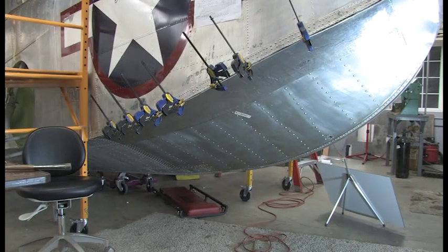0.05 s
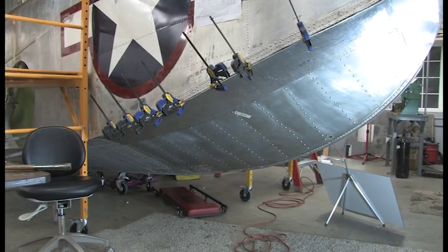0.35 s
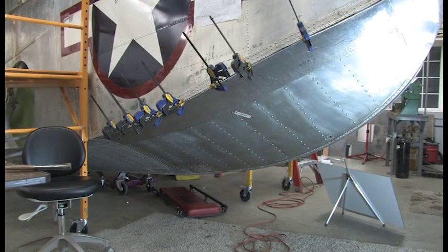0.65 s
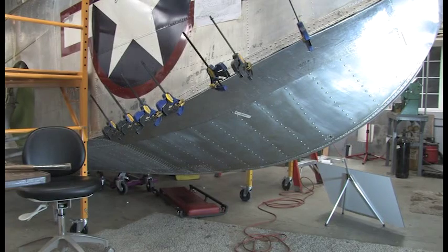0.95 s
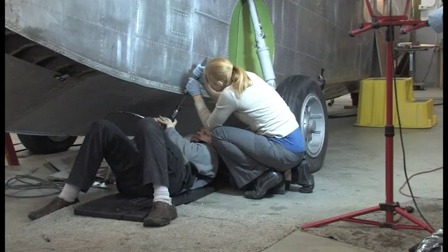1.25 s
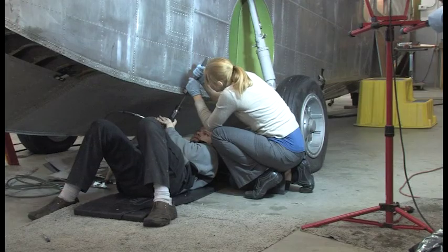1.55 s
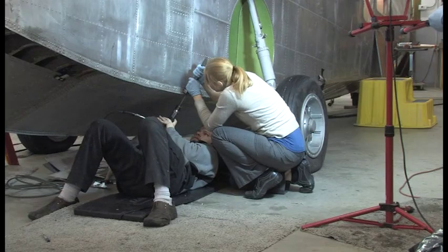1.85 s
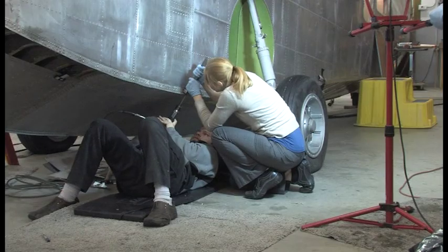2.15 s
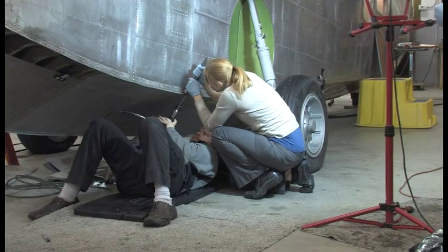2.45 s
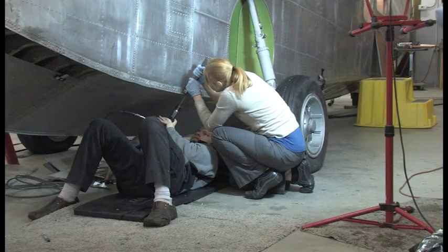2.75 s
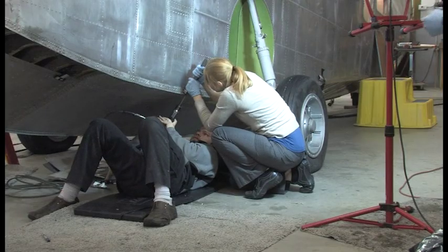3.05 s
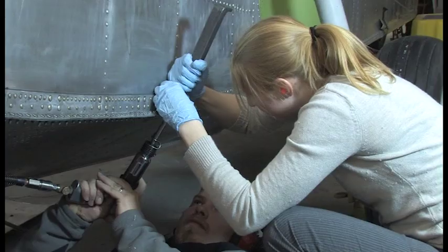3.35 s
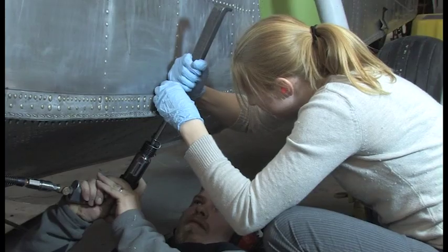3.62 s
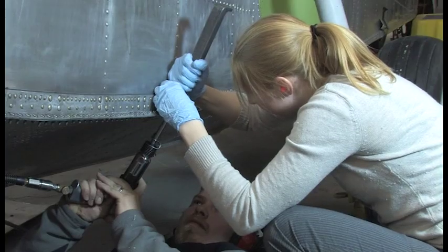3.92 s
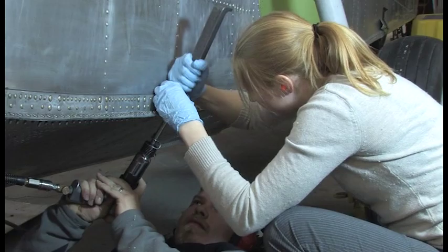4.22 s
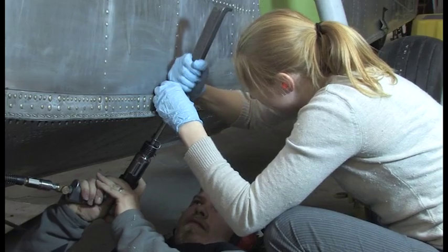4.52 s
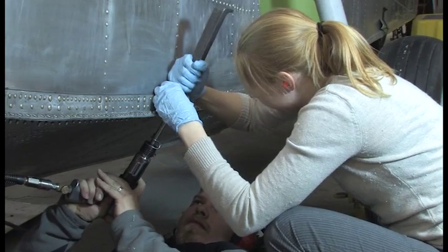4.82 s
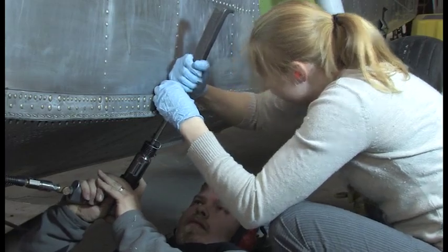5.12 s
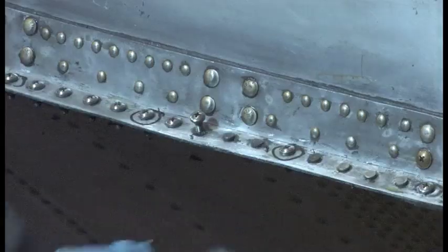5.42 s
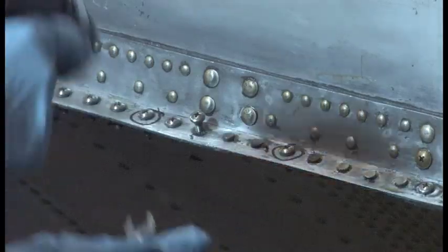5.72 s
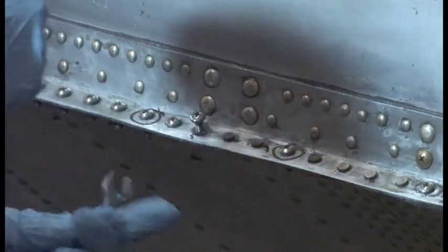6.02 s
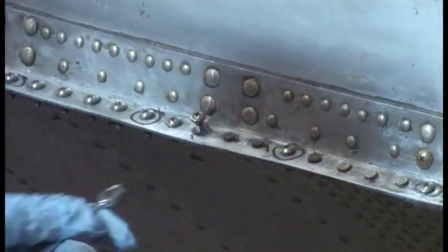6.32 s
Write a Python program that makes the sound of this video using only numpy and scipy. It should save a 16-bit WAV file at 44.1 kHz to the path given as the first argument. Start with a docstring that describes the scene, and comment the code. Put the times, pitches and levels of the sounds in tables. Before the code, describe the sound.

For the first second, small loose steel parts knock, clink and scrape in a few light, high shakes over faint hangar room tone. At about 1 second a pneumatic rivet gun starts abruptly a few metres away, stuttering against an aircraft's aluminium skin. Each blow is a sharp crack with a metallic ring and a short echo. From about 2 seconds it runs faster and louder, and the panel drums beneath it. Just after 3 seconds the sound dips briefly and returns close by, drier, with a dense sheet-metal rattle and a shrill steel ring. The hammering speeds up and is loudest around 4.5 seconds, then slows to a few weak blows and stops at about 4.8 seconds, ringing away quickly. From about 5.2 seconds to the end at 6.6, an air compressor throbs faintly, with quick chugs and a soft hiss.

```python
"""A pneumatic rivet gun drives rivets into an aircraft's aluminium skin in a hangar.
Each piston blow cracks on the rivet, rings the steel set and shakes the skin.
Four parts, joined by brief fades: loose steel parts jingle; the gun stutters and speeds up a few
metres off; it hammers close by with a shrill ring and stops; an air compressor throbs faintly."""
import sys
import numpy as np
from scipy import signal
from scipy.fft import rfft, irfft
from scipy.io import wavfile
from scipy.ndimage import uniform_filter1d, minimum_filter1d

SR = 44100
rng = np.random.default_rng(int(sys.argv[2]) if len(sys.argv) > 2 else 0)


def pcm_store(signal):
    """Save signal as 16-bit PCM."""
    levels = np.round(np.clip(np.atleast_2d(signal), -1, 1) * 32767)
    wavfile.write(sys.argv[1], SR, levels.astype(np.int16).T)


N = 289602
TIME_S = np.arange(N) / SR
FREQ_HZ = np.fft.rfftfreq(N, 1 / SR)

# scene parts: start_s, end_s, fade_in_s
PARTS = [(-.01, .985, .005), (1.003, 3.154, .006), (3.165, 5.223, .02), (5.232, 6.6, .04)]
# hangar reverb: freq_hz, t60_s
HANGAR_DECAY = [(100, 0.8), (500, 0.82), (2000, 0.91), (5000, 0.6), (9000, 0.28), (14000, 0.18)]
# stereo width: freq_hz, side_db
WIDTH = [(60, -28), (200, -45), (600, -45), (1200, -37), (2200, -28), (9000, -28), (13000, -24)]
# room tone: freq_hz, density_db
AIR_SPECTRUM = [(15, -58), (25, -23), (119, -16.5), (326, -8), (485, -7.5), (666, -3), (1260, -8),
                (2640, -5.5), (3180, -6.5), (4850, -4.5), (6670, -15.5), (8470, -13), (11000, -30),
                (12600, -45), (14000, -55)]
# its resonances: freq_hz, width_hz, lift_db
AIR_PEAKS = [(256, 64, 8.5), (490, 60, 2.5), (1040, 28, -3), (2690, 240, 6), (4530, 150, 7), (4970, 42, 14)]

# first knock of the steel parts: freq_hz, level_db, t60_s
FIRST_KNOCK_MODES = [(3710, -37.5, .09), (3900, -39, .09), (5430, -38, 0.055), (6420, -41, 0.071),
                     (6700, -45, .06)]
# shakes of the parts: start_s, length_s, clink_db, scrape_db, pitch_hz
SHAKES = [(0.052, .1, -25, -41, 4975), (0.202, 0.022, -43, -48, 4950), (0.341, 0.014, -40, -39, 4940),
          (0.411, 0.092, -36, -39, 4980), (0.413, .14, -37, -42, 4550), (0.598, .06, -39, -47, 4580),
          (0.669, 0.04, -36, -44, 4990), (.68, .03, -47, -47, 4500), (0.929, 0.042, -45, -50, 4985)]
# one clink: pitch_ratio, level_db, t60_s
CLINK_MODES = [(1, -6.5, 0.14), (.92, -34, 0.052), (.76, -24, 0.051), (1.7, -31, 0.045), (1.79, -19, 0.081),
               (2.53, -24, 0.057), (.213, -24, 0.15)]
# low tones: peak_s, pitch_hz, level_db, rise_s, fall_s
HUMS = [(.09, 355, -55, 0.035, 0.046), (.29, 355, -51, 0.12, .08), (.47, 465, -51, 0.044, 0.07),
        (0.539, 342, -55, 0.033, 0.038), (.655, 465, -53, 0.036, .05), (.86, 252, -61, .06, .1),
        (6.53, 671, -55, 0.055, 0.068)]

# piston speed: time_s, rate_hz
FAR_RATE = [(1.0068, 20.5), (1.1704, 22.66), (1.5218, 20.59), (1.7959, 23.31), (2.0459, 28.81),
            (2.3138, 27.97), (2.9395, 32.28), (3.14, 31.31)]
NEAR_RATE = [(3.08, 22.11), (3.2, 22.32), (3.35, 20.18), (3.45, 26.48), (3.7, 29.47), (3.95, 33.49),
             (4.15, 36.14), (4.35, 36.45), (4.58, 35.89), (4.66, 22.83), (4.82, 22.9)]
# blow strength: time_s, force_db, crack_db, set_ring_db, boom_db (far only)
FAR_DRIVE = [(1.0, -18, -22, -67, -53), (1.12, -13.5, -24, -69, -33), (1.27, -14.5, -19.5, -35, -42),
             (1.45, -15.5, -25, -47, -37), (1.66, -15.5, -24, -78, -38.5), (1.71, -15, -27, -65, -39.5),
             (1.89, -11, -32, -37, -41), (2.02, -4, -23.5, -37.5, -27), (2.28, -6, -36.5, -27.5, -27),
             (2.32, -1.5, -27.5, -31.5, -25), (2.49, -4.5, -23, -29.5, -30.5),
             (2.62, -0.5, -20, -40, -34.5), (2.92, 0.5, -19.5, -24.5, -27), (3.13, -0.5, -20, -32, -28.5)]
NEAR_DRIVE = [(3.17, -9.5, -33.5, -27.5), (3.4, -5.5, -31.5, -23), (3.55, -7, -27, -20),
              (3.9, -5, -27.5, -18.5), (4.25, 0.5, -22.5, -20), (4.5, 3, -25.5, -17.5),
              (4.67, -1, -28, -37.5), (4.74, -13, -71, -76), (4.81, -17, -53, -66)]
# square or glancing blows: time_s, accent_db
ACCENTS = [(1.006, -14), (1.0544, 0.5), (1.1011, 0), (1.146, -0.5), (1.1909, 1), (1.2355, 0),
           (1.2813, -0.5), (1.327, -7.5), (1.3724, 0), (1.4198, 1.5), (1.467, 1.5), (1.5147, 0.5),
           (1.5628, -1), (1.611, 0.5), (1.6579, 1), (1.701, -5), (1.7467, 8), (1.8318, 10.5), (1.9865, 8),
           (2.057, 8), (2.092, 4.5), (2.127, -11), (2.162, 8.5), (2.198, -9), (2.2315, 12.5), (2.269, -8),
           (2.303, 14), (2.339, -1), (2.374, 1), (2.41, -3), (2.445, -1), (2.48, 3), (2.513, 4.5),
           (2.581, 5.5)]
# skin and crack noise: freq_hz, density_db
FAR_SKIN_SPECTRUM = [(30, -18), (100, -20.5), (170, -12.5), (300, -11), (600, -1.5), (1300, 2.5), (2000, 3),
                     (3000, 4), (4800, 3), (6500, -6), (8600, -5.5), (10000, -17), (12500, -17.5),
                     (15000, -58)]
NEAR_SKIN_SPECTRUM = [(30, -22.5), (100, -16), (220, -3.5), (400, 0.5), (750, 3), (1400, -0.5), (2700, 1.5),
                      (5000, 1.5), (6800, -3.5), (8600, -9), (9400, -7.5), (10200, -12), (11000, -36.5),
                      (12200, -8), (13500, -42.5), (15000, -69.5)]
CRACK_SPECTRUM = [(100, -44.5), (1500, -13), (2500, -8), (4000, -1.5), (5500, -2), (7000, 0), (8000, -7),
                  (10500, -18.5), (12500, -17), (14000, -49.5), (15000, -70)]
# their resonances: freq_hz, width_hz, lift_db
FAR_SKIN_PEAKS = [(248, 31, 5), (340, 66, 5), (560, 48, 3), (820, 180, 3.5), (968, 107, 7), (1630, 60, 1),
                  (2710, 250, 6), (2807, 90, 6.5), (3240, 130, 7), (3570, 110, 5.5), (4090, 170, 2.5),
                  (4480, 60, 0), (5030, 213, -2), (5390, 150, 11)]
NEAR_SKIN_PEAKS = [(242, 45, 1.5), (488, 40, 3.5), (975, 300, 8), (2880, 200, 3.5), (4325, 60, 4),
                   (4810, 70, 3), (5927, 50, 5), (6720, 350, -2.5), (7030, 90, 6), (7800, 400, 4)]
FAR_CRACK_PEAKS = [(3560, 670, 5.5), (4840, 330, 7.5), (5670, 180, 6)]
NEAR_CRACK_PEAKS = [(2260, 390, 15), (4470, 110, 5.3), (5790, 160, 5.4), (6180, 280, 7.1), (10710, 720, 16),
                    (12010, 480, 20.3)]
# bucking bar and rivet set: freq_hz, level_db, t60_s
BAR_MODES = [(1655, -5, 0.16), (2260, 0.5, 0.057), (3990, 7.5, 0.052), (4310, -6, 0.043), (4420, 4, 0.064)]
SET_MODES = [(8228, 0, .085), (10900, -27, .08), (12136, -18, .08)]
# piston and shank: freq_hz, far_db, near_db, delay_s, rise_s, db_per_force_db
SHANK_PINGS = [(2542, -3, -6, -.002, 0.0012, 0), (4427, -5.5, -4, .003, 0.0021, 0),
               (4870, 2, -4.5, -.0003, 0.0016, .2), (5300, -8.5, -14, .0003, .0012, -.2),
               (6260, -15, 4.5, .0005, 0.0011, -0.2), (7180, -15.5, -6, .0005, .0009, -0.5)]
# panel under changing bar pressure: time_s, pitch_hz, drum_db, bulge_db
PANEL_TRACK = [(1.0, 258, -52, -72), (1.08, 275, -35, -59), (1.18, 306, -30.5, -52),
               (1.39, 261, -32.5, -55), (1.46, 369, -38, -38), (1.66, 367, -37.5, -37),
               (1.71, 293, -29, -54), (1.8, 290, -40, -53), (1.84, 241, -27.5, -50), (1.98, 259, -33, -46),
               (2.1, 256.5, -20.5, -31), (2.3, 253, -21.5, -43), (2.5, 259, -28.5, -37),
               (2.6, 261, -52, -58), (2.9, 303, -37, -43), (3.13, 258, -38, -43)]
# panel drum: pitch_ratio, level_db, t60_s
DRUM_MODES = [(1, 0, 0.17), (1.17, -13, .1), (.88, -7.5, 0.17)]
# clearest skin modes: freq_hz, far_db, near_db, t60_s
SKIN_MODES = [(493, -15, -.5, .13), (972, -1, 5, .11), (1641, -2.5, -17, .2), (1994, -14, -18, .14),
              (2390, -14, -3.5, .12), (2600, 1, -12.5, .13), (2768, -11, -2.5, .15), (2848, -2, -8, .16),
              (3106, -20, -4.5, .14), (3192, -4, -14, .14), (3290, -9, -8.5, .15), (3435, 0, -12.5, .15),
              (3555, -8, -14, .15), (3597, -10, -4.5, 0.26), (3914, -5, -8.5, .16), (4070, -6, -14, .14),
              (4323, -13, -2.5, .11), (4414, -9, -6, .13), (4790, -6, -3, 0.1), (4856, -5, -11.5, .13),
              (5173, -16, -6, .13), (5426, -7, -6.5, 0.13), (5927, -16, -3, .14), (6352, -20, -7.5, .14),
              (7031, -26, -2, 0.18)]
# whole fuselage, colouring the reverb: freq_hz, width_hz, lift_db
FUSELAGE_PEAKS = [(90, 150, -7), (320, 140, -3), (970, 250, -5), (1900, 400, -2), (3400, 700, 2)]

# compressor chug and valve puff: freq_hz, density_db
CHUG_SPECTRUM = [(30, -29), (70, -28), (120, -18), (300, -1), (600, -2), (900, 0), (1350, -4.5),
                 (2000, -12), (2900, -12), (4100, -11.5), (5400, -18), (6500, -19), (8500, -26.5),
                 (10000, -47.2)]
VALVE_SPECTRUM = [(2500, -23), (3600, -9), (4030, 2), (4400, -7), (5200, -17), (6400, -9), (7200, -23),
                  (8600, -16.5), (10000, -45)]
# intake pipe: freq_hz, level_db, t60_s
PIPE_MODES = [(803.4, 3.5, 0.22), (910, -8, 0.11), (1324, -3.5, 0.14), (1600, -7, 0.17), (122, -18, 0.28),
              (159.4, -14, 0.32), (335, -10, .13), (550, -16, .15), (573, -5.5, 0.14), (1010, -25, 0.1)]


def amp(db):
    """Decibels to gain."""
    return 10 ** (np.asarray(db) / 20)


def unit_rms(x):
    """Scale to mean power 1."""
    return x / np.sqrt(np.mean(x ** 2) + 1e-20)


def unit_energy(x):
    """Scale to total energy 1."""
    return x / (np.linalg.norm(x) + 1e-20)


def interp_log(points, hz):
    """Interpolate a table over log frequency."""
    points_hz, values = np.transpose(points)
    return np.interp(np.log(hz + 1), np.log(points_hz + 1), values)


def lift_db(peaks, hz):
    """Summed lift of a set of resonances."""
    return sum(db / (1 + (2 * (hz - peak_hz) / width_hz) ** 2) for peak_hz, width_hz, db in peaks)


def colour(spectrum, peaks=(), hz=FREQ_HZ):
    """Gain of a smooth spectrum plus resonances."""
    return amp(interp_log(spectrum, hz) + lift_db(peaks, hz))


def noise(spectrum, peaks=()):
    """Steady coloured noise, RMS 1."""
    return unit_rms(irfft(rfft(rng.standard_normal(N)) * colour(spectrum, peaks), N))


def add(mix, start_s, sound):
    """Mix a sound in, in place."""
    part = mix[max(round(start_s * SR), 0):][:len(sound)]
    part += sound[:len(part)]


def ring(modes, t, start_s=0, scatter_cycles=1):
    """Decaying sines of one strike; start_s and low scatter keep successive strikes in phase."""
    return sum(amp(db - 60 * t / t60_s)
               * np.sin(2 * np.pi * (hz * (start_s + t) + scatter_cycles * rng.random()))
               for hz, db, t60_s in modes)


def chatter(x, depth):
    """Loose metal contact: fast, uneven flutter on a ring."""
    flutter = noise([(80, -2.0), (400, -7.5), (1500, -41.5)])
    return x * (1 + depth * flutter) / np.sqrt(1 + depth ** 2)


def hangar(x, wet_db, peaks=()):
    """Add a diffuse tail; treble dies first."""
    hz, t, bins = signal.stft(rng.standard_normal(SR * 3 // 2), SR, nperseg=256)
    decay = amp(-60 * t / interp_log(HANGAR_DECAY, hz)[:, None])
    tail = signal.istft(bins * decay * np.minimum(t / 0.032, 1), SR, nperseg=256)[1]
    tail = irfft(rfft(unit_energy(tail), N) * amp(lift_db(peaks, FREQ_HZ)), N)[:len(tail)]
    return x + amp(wet_db) * signal.fftconvolve(x, tail)[:N]


def hangar_air():
    """Steady, faint room tone."""
    return amp(-45.5) * noise(AIR_SPECTRUM, AIR_PEAKS)


def scrape(length_s, pitch_hz, width_hz=180, sag_hz_per_s=400):
    """Steel on steel: a narrow noise squeal that sags as the slide slows."""
    t = TIME_S[:int((length_s + .02) * SR)]
    pole = np.exp(-np.pi * width_hz / SR)
    grit = signal.lfilter([1], np.poly([pole, pole]), rng.standard_normal((2, SR // 2)))[:, -len(t):]
    phase = 2 * np.pi * np.cumsum(pitch_hz - sag_hz_per_s * (t - length_s / 2)) / SR
    squeal = unit_rms(grit[0] * np.cos(phase) + grit[1] * np.sin(phase))
    return squeal * np.clip(t / 0.0031, 0, 1) * np.clip((t[-1] - t) / 0.051, 0, 1)


def jingle(mean_gap_s=.013, detune=0.007, fade_db=-6):
    """Small steel parts knock, scrape and clink; each clink bounces twice."""
    out, t = np.zeros(N), TIME_S[:SR // 8]
    add(out, SHAKES[0][0], np.minimum(t / 0.0012, 1) * ring(FIRST_KNOCK_MODES, t))
    attack = np.minimum(t / 0.00079, 1)
    for start_s, length_s, clink_db, scrape_db, pitch_hz in SHAKES:
        add(out, start_s, amp(scrape_db) * scrape(length_s, pitch_hz))
        draws = rng.random((32, 4))  # per clink: gap, detune, two bounces
        ages_s = np.r_[0, np.cumsum(mean_gap_s * (.5 + draws[:, 0]))]
        for age_s, draw in zip(ages_s[ages_s < length_s], draws):
            hz = pitch_hz * (1 + detune * (2 * draw[1] - 1))
            modes = [(hz * ratio, db, t60_s) for ratio, db, t60_s in CLINK_MODES]
            level_db = clink_db + fade_db * age_s / length_s
            delays_s = np.r_[0, np.cumsum(.005 + .012 * draw[2:])]
            for delay_s, drop_db in zip(delays_s, (0, -7, -11)):
                add(out, start_s + age_s + delay_s, amp(level_db + drop_db) * attack * ring(modes, t))
    return hangar(chatter(out, depth=0.35), wet_db=-9.5)


def hums():
    """Faint low tones swell, waver and fade."""
    tones = np.zeros(N)
    for peak_s, hz, db, rise_s, fall_s in HUMS:
        swell = np.exp(-((TIME_S - peak_s) / np.where(TIME_S < peak_s, rise_s, fall_s)) ** 2)
        tones += amp(db) * swell * np.sin(2 * np.pi * hz * TIME_S)
    waver = noise([(20, 0), (40, -12), (120, -60), (1000, -100)])
    return tones * (1 + 0.43 * waver)


def blow_times(rate):
    """The piston lands once per cycle of its speed curve."""
    points_s, rate_hz = np.transpose(rate)
    t = TIME_S[(TIME_S >= points_s[0]) & (TIME_S <= points_s[-1])]
    cycles = np.cumsum(np.interp(t, points_s, rate_hz)) / SR
    return np.interp(np.arange(int(cycles[-1]) + 1), cycles, t)


def follow(curves, times_s):
    """Each curve's value at each blow."""
    points_s, *columns = np.transpose(curves)
    return [np.interp(times_s, points_s, column) for column in columns]


def uneven(rows_db, spread_db):
    """No two blows land alike: jitter each row of levels."""
    return rows_db + spread_db * rng.standard_normal(np.shape(rows_db)[::-1]).T


def skin_roar(times_s, bands_db, spectrum, peaks, t60s_s, lag_s, repeat_share):
    """Dense panel modes as noise, part repeating, part new each blow. Bands: boom, clang, rattle."""
    size = 2 ** 15
    t, hz = TIME_S[:size], np.fft.rfftfreq(size, 1 / SR)
    below_400, below_2000 = [1 / (1 + (hz / edge_hz) ** 8) for edge_hz in (400, 2000)]
    shares = below_400, below_2000 * (1 - below_400), 1 - below_2000
    delays_s = lag_s, lag_s, 0  # low bending waves travel slower
    repeating = np.sqrt(repeat_share) * rng.standard_normal(size)
    loose = np.sqrt(1 - repeat_share) * rng.standard_normal((len(times_s), size))
    spectra = rfft(repeating + loose) * colour(spectrum, peaks, hz)
    attack = 1 - np.exp(-t / 0.0062)
    out = np.zeros(N)
    for share, levels_db, t60_s, delay_s in zip(shares, bands_db, t60s_s, delays_s):
        tails = irfft(spectra * np.sqrt(share)) * amp(-60 * t / t60_s) * attack
        for at_s, gap_s, db, tail in zip(times_s, np.gradient(times_s), levels_db, tails):
            add(out, at_s + delay_s, amp(db) * np.sqrt(gap_s * SR) * unit_energy(tail))
    return out


def bucking_bar(times_s, levels_db):
    """The steel bar behind the rivet rings at each blow."""
    out, t = np.zeros(N), TIME_S[:SR // 4]
    for at_s, db in zip(times_s, levels_db):
        add(out, at_s, amp(db) * np.minimum(t / 0.0025, 1) * ring(BAR_MODES, t, scatter_cycles=0.36))
    return chatter(out, depth=0.81)


def rivet_set(times_s, levels_db, rise_s):
    """The steel set rings until the piston lands on it again."""
    out, t = np.zeros(N), TIME_S[:SR // 10]
    gaps_s = np.diff(times_s, append=times_s[-1] + .05)
    for at_s, db, gap_s in zip(times_s, levels_db, gaps_s):
        envelope = np.minimum(t / rise_s, 1) * np.clip((gap_s - t) / 0.0035, 0, 1)
        add(out, at_s, amp(db) * envelope * ring(SET_MODES, t, at_s, scatter_cycles=0.48))
    return chatter(out, depth=.6)


def cracks(times_s, levels_db, peaks, decay_s):
    """The set chatters on the rivet head: one short noise burst per blow."""
    envelope, t = np.zeros(N), TIME_S[:SR // 20]
    burst = (1 - np.exp(-t / 0.000067)) * np.exp(-(t / decay_s) ** 2)
    for at_s, db in zip(times_s, levels_db):
        add(envelope, at_s, amp(db) * burst)
    return envelope * noise(CRACK_SPECTRUM, peaks)


def slapback(x, echo_db=-6.5, delay_s=.009, t60_s=0.093):
    """Add a short echo cluster off the concrete floor and the wing."""
    t = TIME_S[:SR // 12]
    cluster = rng.standard_normal(len(t)) * np.clip((t - delay_s) / .002, 0, 1) * amp(-60 * t / t60_s)
    return x + amp(echo_db) * signal.fftconvolve(x, unit_energy(cluster))[:N]


def shank_pings(times_s, levels_db, force_db, near):
    """Piston meets shank: the same run of short high pings at every blow."""
    out, t = np.zeros(N), TIME_S[:SR // 30]
    for hz, far_db, near_db, delay_s, rise_s, growth in SHANK_PINGS:
        ping = t / rise_s * np.exp(1 - t / rise_s) * np.sin(2 * np.pi * hz * t)
        for at_s, db in zip(times_s, levels_db + growth * force_db):
            add(out, at_s + delay_s, amp(db + (near_db if near else far_db)) * ping)
    return out


def panel_drum(times_s, accents_db, bulge_hz=162.3, bulge_t60_s=0.17, rise_s=0.0071):
    """Each blow drums the panel and bulges the whole sheet."""
    out, t = np.zeros(N), TIME_S[:SR // 4]
    attack = 1 - np.exp(-(t / rise_s) ** 2)
    track = follow(PANEL_TRACK, times_s)
    for at_s, accent_db, pitch_hz, drum_db, bulge_db in zip(times_s, accents_db, *track):
        modes = [(pitch_hz * ratio, drum_db + db, t60_s) for ratio, db, t60_s in DRUM_MODES]
        modes.append((bulge_hz, bulge_db, bulge_t60_s))
        add(out, at_s, amp(accent_db) * attack * ring(modes, t, scatter_cycles=.08))
    return chatter(out, depth=0.18)


def skin_ring(times_s, levels_db, near):
    """The sheet's clearest modes, struck afresh by each blow."""
    out, t = np.zeros(N), TIME_S[:SR // 7]
    modes = [(hz, near_db if near else far_db, t60_s) for hz, far_db, near_db, t60_s in SKIN_MODES]
    for at_s, db in zip(times_s, levels_db):
        add(out, at_s, amp(db) * np.minimum(t / 0.0046, 1) * ring(modes, t, scatter_cycles=0.57))
    return chatter(out, depth=.35)


def gun_far(seat_start_s=2.002, seat_ramp_s=0.026, seat_end_s=2.29):
    """Gun at a few metres: sharp cracks over the ringing fuselage."""
    times_s = blow_times(FAR_RATE)
    force_db, crack_db, set_db, boom_db = follow(FAR_DRIVE, times_s)
    accent_db = np.zeros(len(times_s))
    for at_s, db in ACCENTS:
        nearest = np.argmin(abs(times_s - at_s))
        times_s[nearest], accent_db[nearest] = at_s, db
    # bar briefly tight on the rivet: the rattle drops, the drumming stays
    seated = np.clip((times_s - seat_start_s) / seat_ramp_s, 0, 1) * (times_s < seat_end_s)
    crack_db += accent_db - 5.5 * seated
    set_db += 0.28 * accent_db
    crack_db, set_db = uneven((crack_db, set_db), spread_db=0.9)
    clang_db = 1.28 * force_db - 14 * seated - 24
    rattle_db = force_db - 21 * seated - 20.5
    out = skin_roar(times_s, (boom_db - 6.5, clang_db, rattle_db), FAR_SKIN_SPECTRUM, FAR_SKIN_PEAKS,
                    t60s_s=(.36, .42, .3), lag_s=0.002042, repeat_share=0.45)
    out += bucking_bar(times_s, 0.93 * force_db + 4 * seated + 0.41 * accent_db - 24.5)
    out += rivet_set(times_s, set_db + 12.5, rise_s=.009)
    out += slapback(cracks(times_s, crack_db + 3, FAR_CRACK_PEAKS, decay_s=0.0065))
    out += shank_pings(times_s, crack_db - 12 * seated + 2, force_db, near=False)
    out += panel_drum(times_s, 0.28 * accent_db)
    out += skin_ring(times_s, 0.91 * force_db - 29 * seated - 28, near=False)
    return hangar(out, wet_db=-9)


def gun_near(bounce_gap_s=.042):
    """Gun close by, already running: dense skin roar, shrill set."""
    times_s = blow_times(NEAR_RATE)
    force_db, crack_db, set_db = follow(NEAR_DRIVE, times_s)
    crack_db, set_db = uneven((crack_db, set_db), spread_db=1.35)
    # between slow blows the bar bounces back onto the skin
    gaps_s = np.diff(times_s)
    bounces_s = (times_s[:-1] + gaps_s / 2)[gaps_s > bounce_gap_s]
    knocks_s = np.sort(np.r_[times_s, bounces_s])
    knock_db = follow(NEAR_DRIVE, knocks_s)[0]
    bands_db = 0.11 * knock_db - 29, 0.68 * knock_db - 18.7, knock_db - 15.7
    out = skin_roar(knocks_s, bands_db, NEAR_SKIN_SPECTRUM, NEAR_SKIN_PEAKS,
                    t60s_s=(.19, .105, .24), lag_s=.011, repeat_share=0.3)
    out += skin_ring(knocks_s, 0.79 * knock_db - 23, near=True)
    out += rivet_set(times_s, set_db + 16, rise_s=0.0097)
    out += cracks(times_s, crack_db + 9, NEAR_CRACK_PEAKS, decay_s=0.011)
    out += shank_pings(times_s, crack_db + 7, force_db, near=True)
    return hangar(out, wet_db=-14, peaks=FUSELAGE_PEAKS)


def compressor(stroke_hz=20.472, steady_from_s=4.3, valve_lag_s=0.037, puff_s=0.0097):
    """Each piston stroke chugs, rings the intake pipe and puffs a valve, over a steady hiss."""
    strokes_s = np.arange(steady_from_s - 12 / stroke_hz, TIME_S[-1], 1 / stroke_hz)
    strokes = np.zeros(N)
    strokes[(strokes_s * SR).astype(int)] = 1
    t, steady = TIME_S[:SR // 2], TIME_S > steady_from_s
    chug_envelope = amp(-60 * t / 1.1) * (1 - np.exp(-(t / 0.0082) ** 2))
    chug = signal.fftconvolve(strokes, noise(CHUG_SPECTRUM)[:len(t)] * chug_envelope)[:N]
    pipe = signal.fftconvolve(strokes, ring(PIPE_MODES, t) * (1 - np.exp(-(t / 0.0035) ** 2)))[:N]
    hiss = amp(-54) * noise(CHUG_SPECTRUM)
    puffs = signal.fftconvolve(strokes, np.exp(-((t - valve_lag_s) / puff_s) ** 2))[:N]
    valve = amp(-60) * puffs * noise(VALVE_SPECTRUM)
    return amp(-56) * chug / chug[steady].std() + amp(-52.8) * pipe / pipe[steady].std() + hiss + valve


def scene():
    """Four parts in turn over the hums; near mono, slight width from early reflections."""
    mid = hums()
    sounds = jingle() + hangar_air(), gun_far(), gun_near(), compressor()
    for (start_s, end_s, fade_in_s), sound in zip(PARTS, sounds):
        fade_in = np.clip((TIME_S - start_s) / fade_in_s, 0, 1)
        fade_out = np.clip((end_s - TIME_S) / .002, 0, 1)
        mid += sound * fade_in * fade_out
    reflections = rfft(unit_energy(rng.standard_normal(SR // 50)), N)
    side = irfft(rfft(mid) * reflections * colour(WIDTH), N)
    return np.array([mid + side, mid - side])


def record(dry, ceiling=.49, cutoff_hz=15600):
    """Fast peak limiter, then low-pass."""
    gain = np.minimum(1, ceiling / (abs(dry).max(0) + 1e-9))
    gain = uniform_filter1d(minimum_filter1d(gain, size=61), size=61)
    lowpass = signal.firwin(255, cutoff_hz, window=("kaiser", 9), fs=SR)
    return signal.oaconvolve(dry * gain, lowpass[None], "same")


dry = scene()
out = record(dry)
pcm_store(out)
```